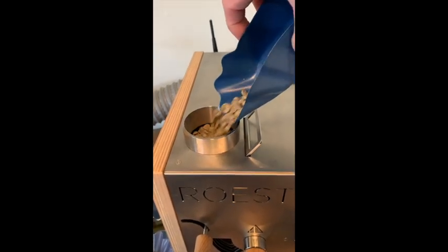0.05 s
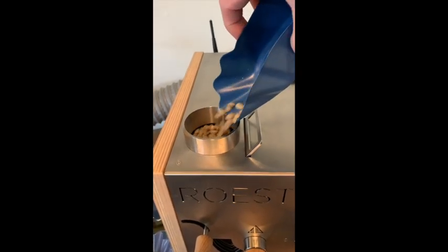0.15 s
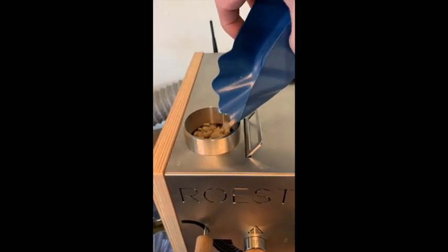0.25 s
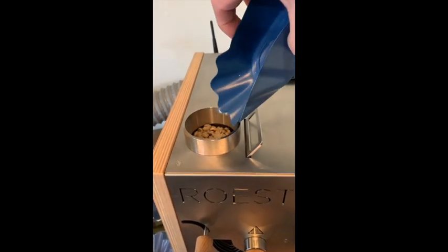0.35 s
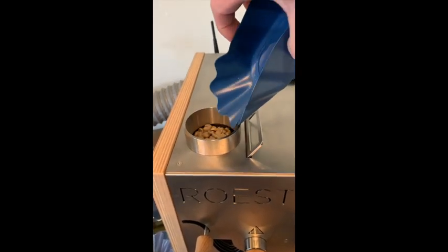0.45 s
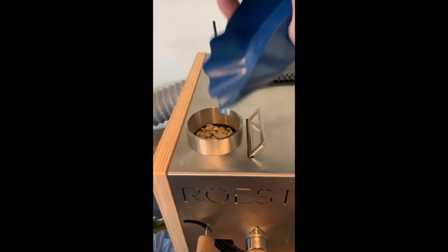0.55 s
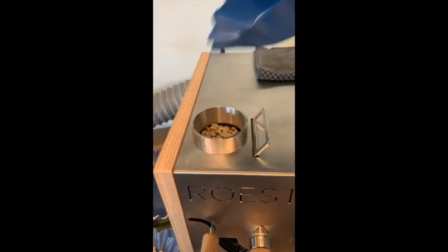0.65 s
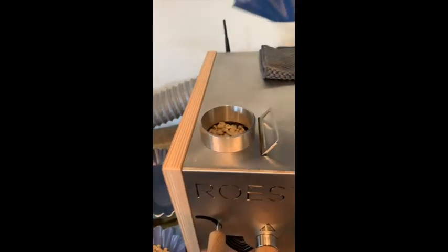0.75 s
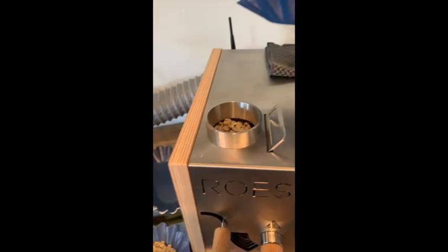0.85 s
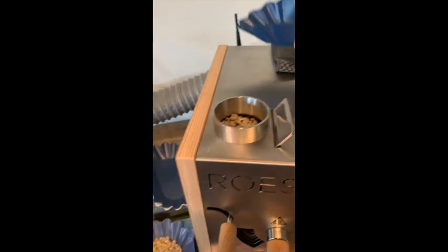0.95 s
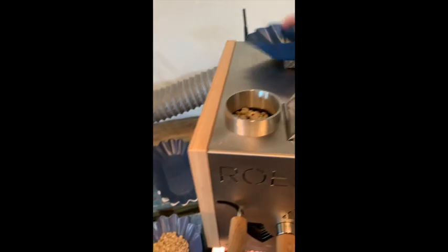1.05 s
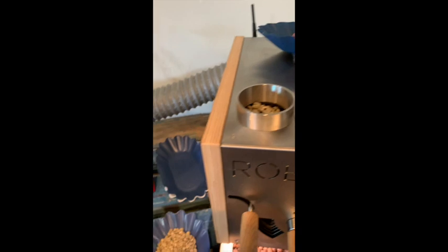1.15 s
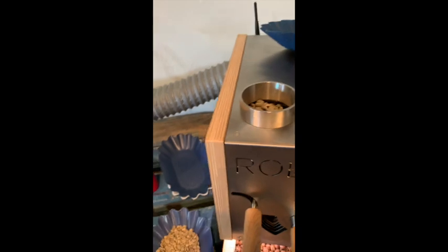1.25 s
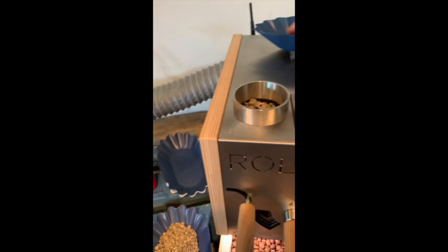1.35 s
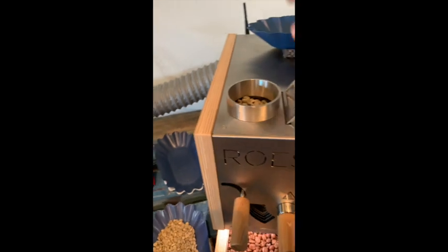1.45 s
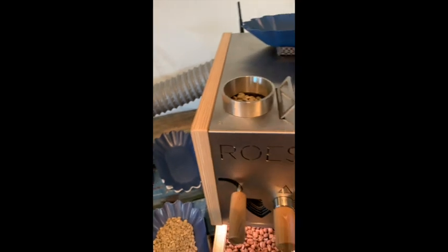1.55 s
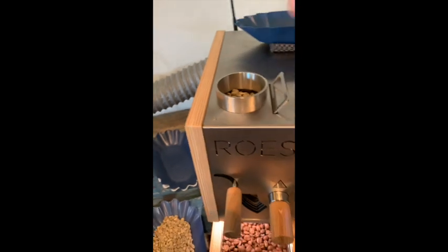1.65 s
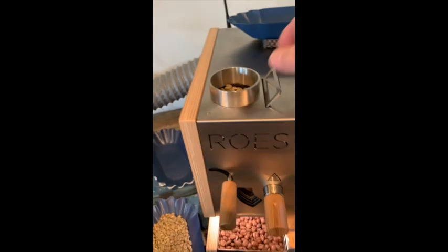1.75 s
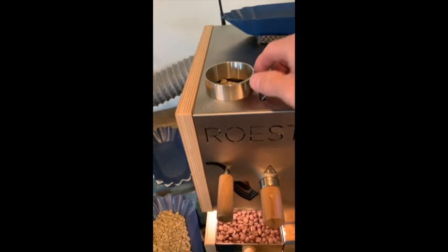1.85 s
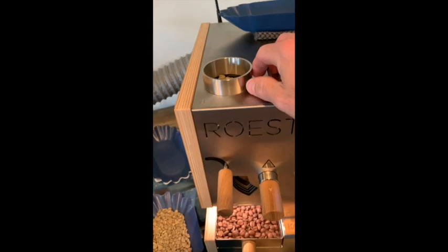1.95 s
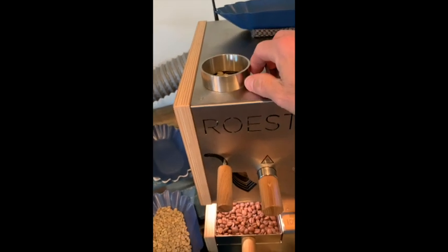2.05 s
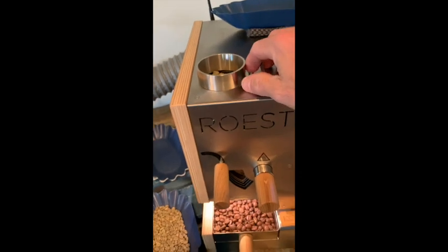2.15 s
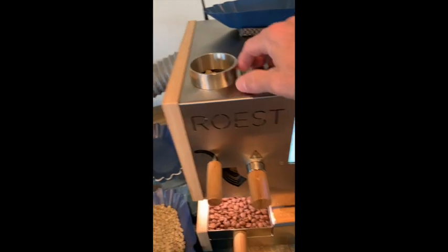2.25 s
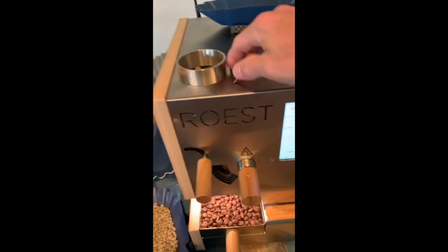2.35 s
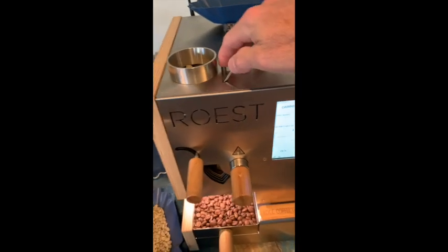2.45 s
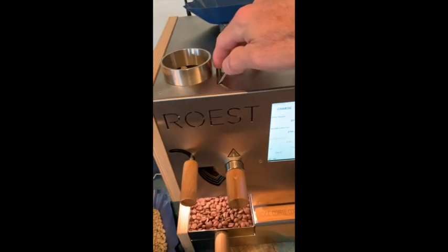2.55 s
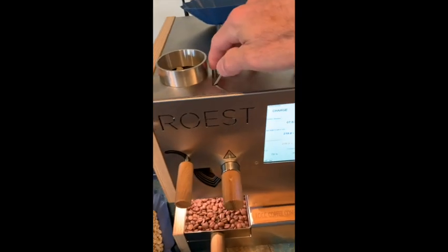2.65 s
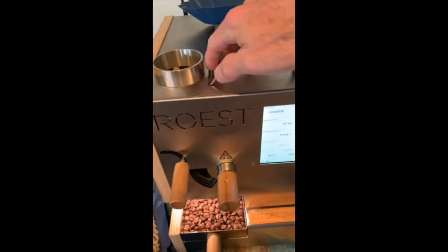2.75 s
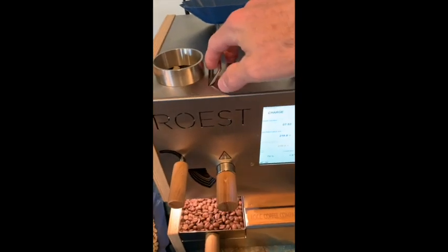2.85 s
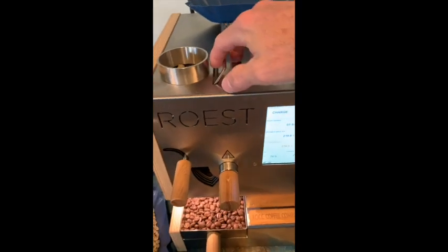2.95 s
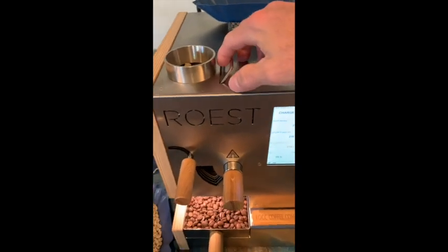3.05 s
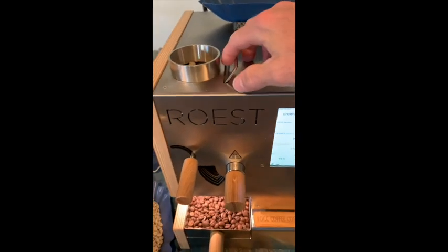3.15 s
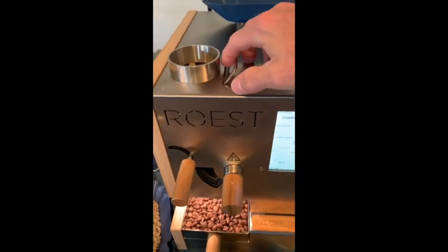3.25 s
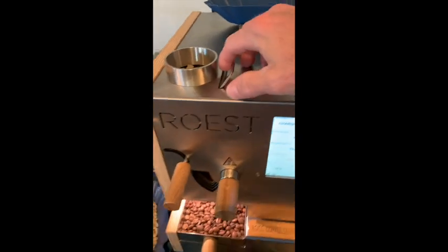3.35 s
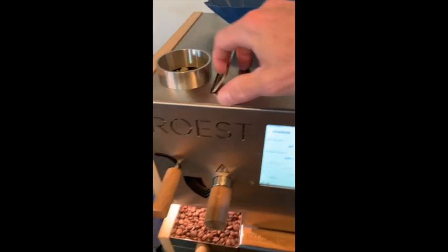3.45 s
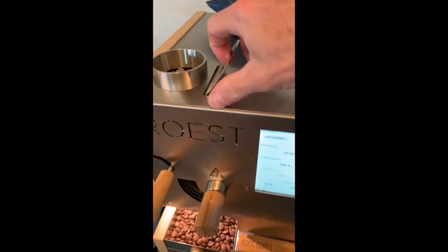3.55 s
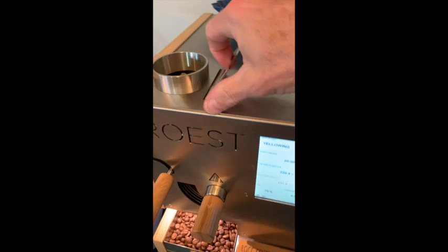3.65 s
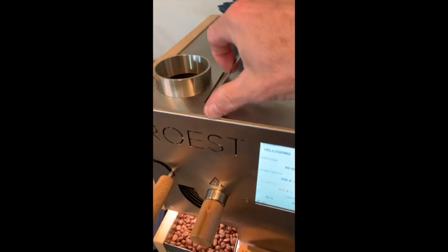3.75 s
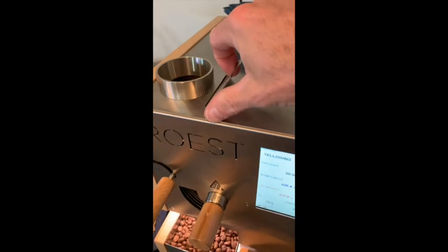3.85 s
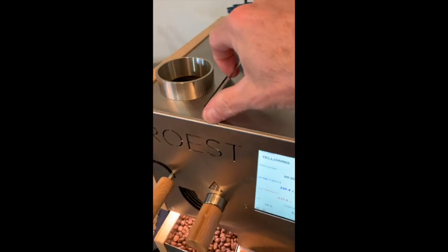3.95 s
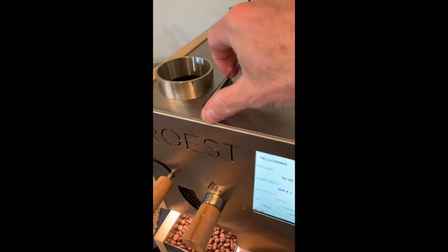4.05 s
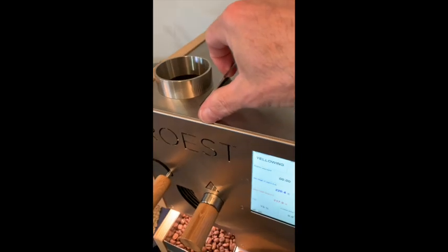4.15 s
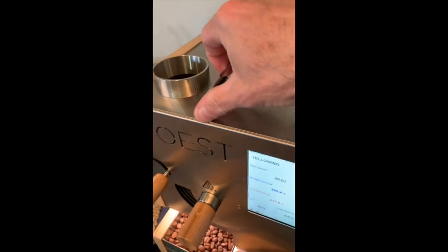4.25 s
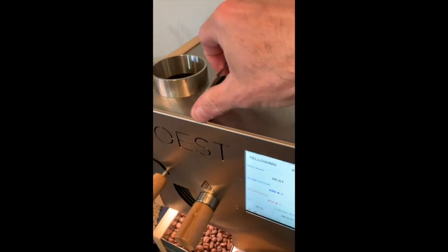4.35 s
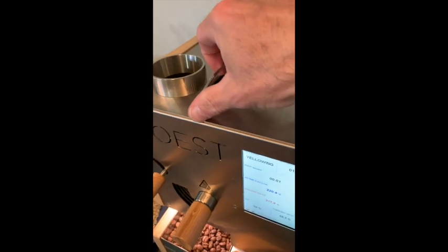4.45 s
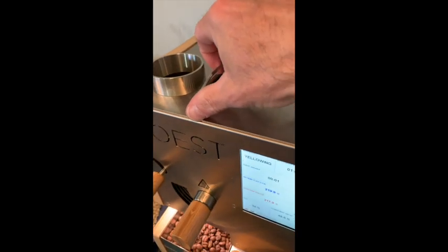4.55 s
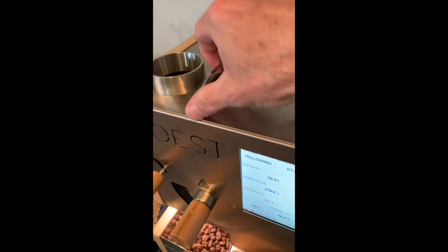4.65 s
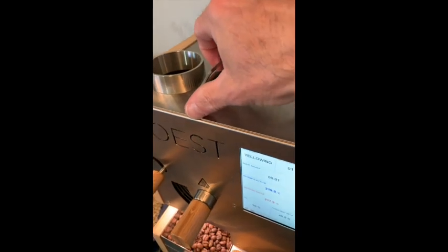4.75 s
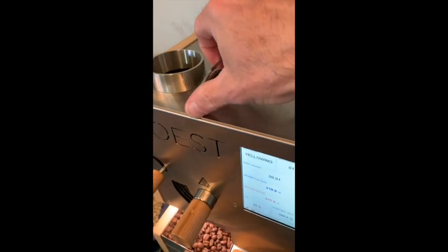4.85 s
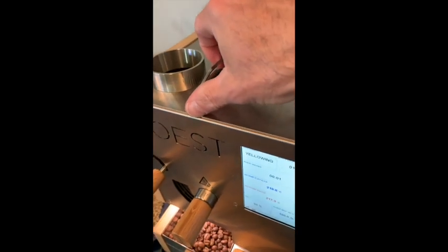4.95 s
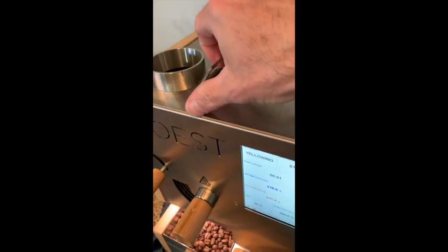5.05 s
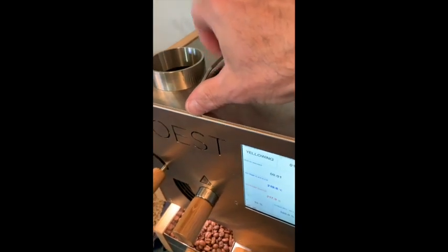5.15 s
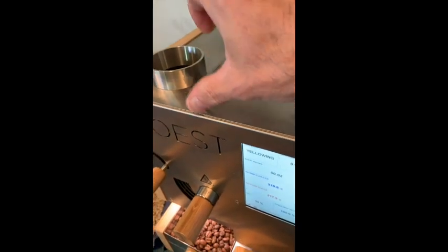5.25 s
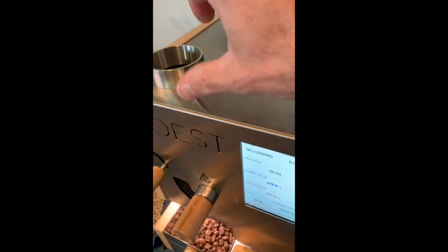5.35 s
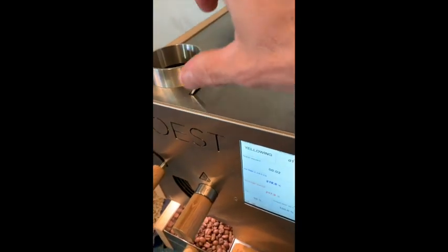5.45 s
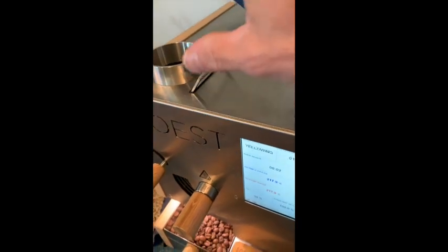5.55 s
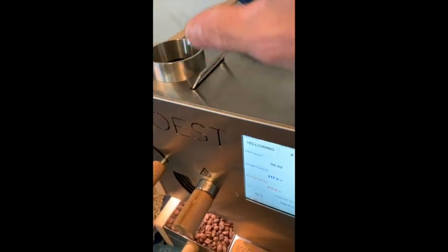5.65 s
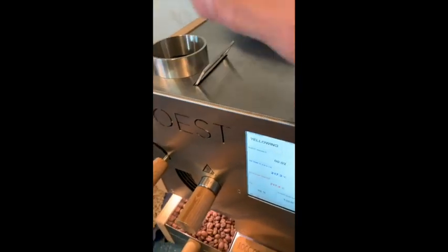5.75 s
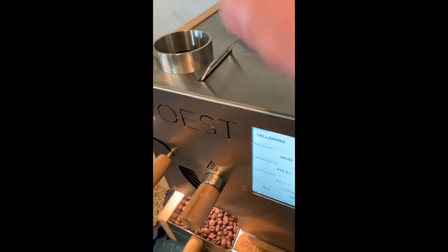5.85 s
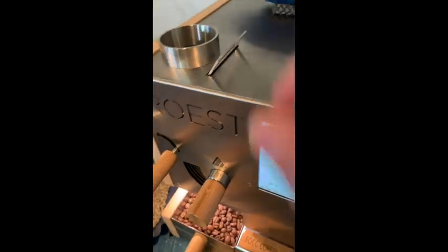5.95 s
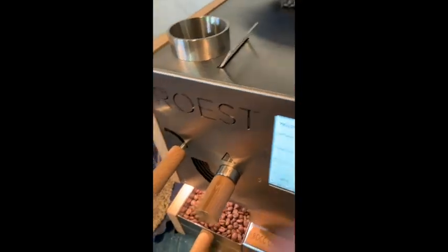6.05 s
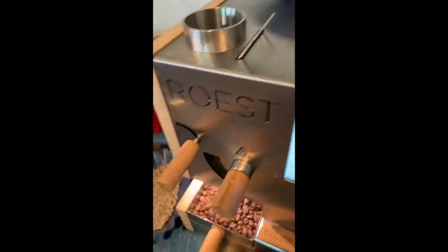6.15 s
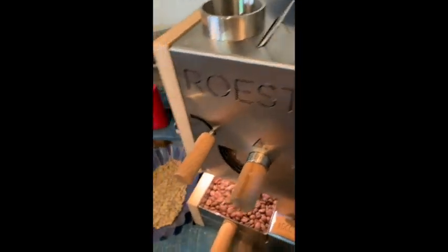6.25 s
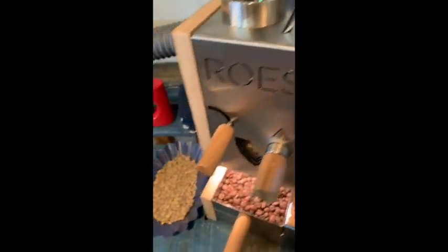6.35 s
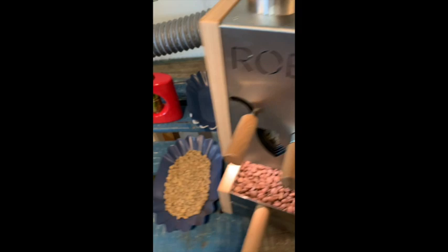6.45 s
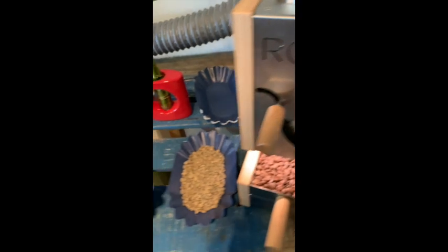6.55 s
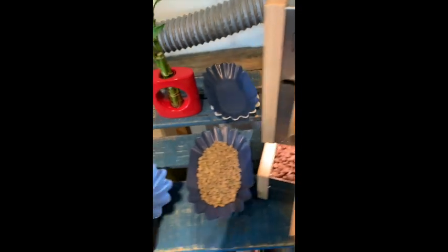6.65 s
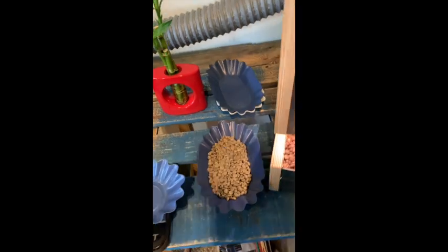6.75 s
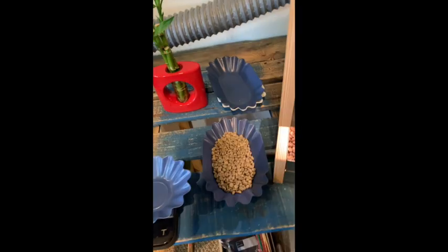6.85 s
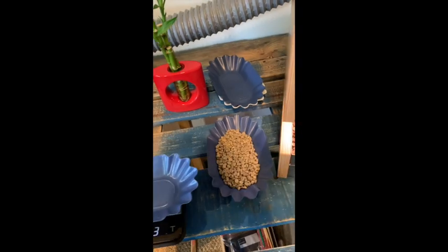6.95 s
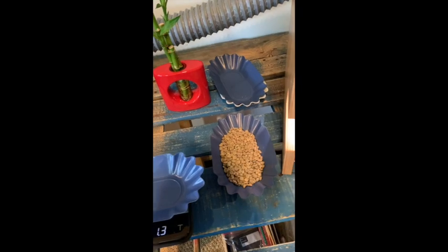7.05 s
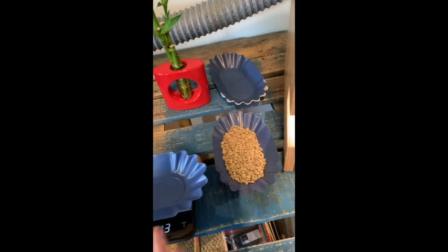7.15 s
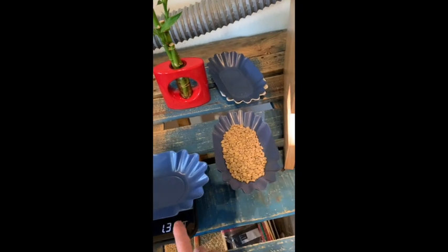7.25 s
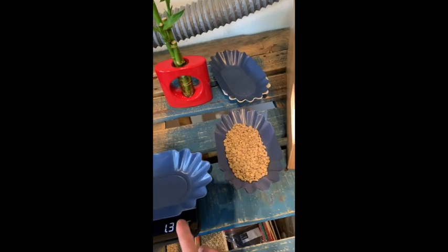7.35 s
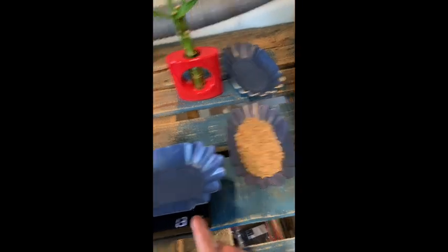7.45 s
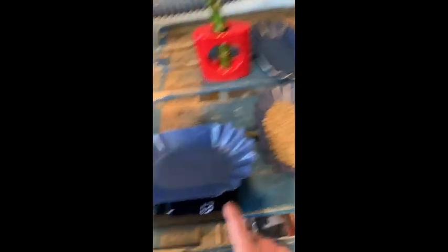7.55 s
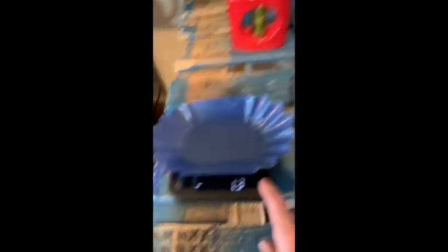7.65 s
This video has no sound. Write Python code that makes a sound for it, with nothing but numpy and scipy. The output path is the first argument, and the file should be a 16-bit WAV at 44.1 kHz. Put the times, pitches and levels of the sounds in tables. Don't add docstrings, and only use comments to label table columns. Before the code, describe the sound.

Over a low machine hum, beans rattle into a metal cup, then a sharp lever clack releases them into a drum; a second clack follows.

```python
import sys
import numpy as np
from scipy import signal
from scipy.fft import rfft, irfft, next_fast_len
from scipy.io import wavfile
from scipy.ndimage import uniform_filter1d, map_coordinates

SR = 44100
rng = np.random.default_rng(int(sys.argv[2]) if len(sys.argv) > 2 else 0)


def output_pcm(signal):
    pcm = np.clip(np.atleast_2d(signal).T, -1, 1) * 32767
    wavfile.write(sys.argv[1], SR, np.round(pcm).astype(np.int16))


def magnitude_from_level(level_db):
    exponent = np.asarray(level_db, float) / 20
    return 10 ** exponent


N = 340447
LANDED_S = 4.5

# t/s, peak level/dB, brightness/dB
OPEN = [
    (3.5185, -12.5, 12),
    (3.5215, -10.5, -11),
    (3.5245, -6, -11),
    (3.530, -15.5, 3),
    (3.536, -22.5, 5),
    (3.547, -31, 8),
    (3.571, -28, -6),
]
# t/s, peak level/dB, brightness/dB
SHUT = [
    (5.2212, -23, 12),
    (5.2288, -12, 10.5),
    (5.2331, -7, 6),
    (5.243, -17.5, 10.5),
]
# t/s, level/dB
NEAR = [(0, 0), (1.9, -1), (2.6, -0.5), (4.2, -1.5), (4.7, -3.5), (6.4, -4.5), (6.9, -6), (7.72, -8.5)]


def unit(x):
    return x / np.sqrt(np.mean(x ** 2) + 1e-20)


def along(points, hz):
    f, v = np.transpose(points)
    return np.interp(np.log(hz + 1), np.log(f + 1), v)


def curve(points, **ends):
    s, v = np.transpose(points)
    return np.interp(np.arange(N) / SR, s, v, **ends)


def ramp(start_s, rise_s):
    return np.clip((np.arange(N) / SR - start_s) / rise_s, 0, 1)


def wobble(rate):
    knots = rng.standard_normal(int(N * rate / SR) + 4)
    return map_coordinates(knots, [np.arange(N) * rate / SR])


def noise():
    return rng.standard_normal(N)


def filtered(x, response):
    m = next_fast_len(N + SR // 2)
    return irfft(rfft(x, m) * response(np.fft.rfftfreq(m, 1 / SR)), m)[..., :N]


def coloured(x, spectrum):
    closed = [(spectrum[0][0] / 2, -120), *spectrum, (spectrum[-1][0] * 1.03, -120)]
    return unit(filtered(x, lambda hz: magnitude_from_level(along(closed, hz))))


def overlaid(when, rings):
    start = (when * N).astype(int)
    length = rings.shape[1]
    places = start[:, None] + np.arange(length)
    return np.bincount(places.ravel(), rings.ravel(), N + length)[:N]


def strikes(lo_hz, hi_hz, t60, scatter_db, tick_db, count):
    when, pitch, size = rng.random((count, 3)).T
    size = magnitude_from_level(-scatter_db * np.log(1 - size))
    t = np.arange(160) / SR
    fade = magnitude_from_level(-60 * t / t60) * np.hanning(2 * len(t))[len(t):]
    hz = lo_hz + pitch * (hi_hz - lo_hz)
    rings = size[:, None] * fade * np.sin(2 * np.pi * hz[:, None] * t)
    clicks = np.bincount((when * N).astype(int), size * np.sign(pitch - .5), N)
    return unit(overlaid(when, rings)) + magnitude_from_level(tick_db) * unit(clicks)


def steel(modes, later_modes, t60, spread, count):
    when, which, size, off = rng.random((count, 4)).T
    pick = lambda table: np.array(table)[(which * len(table)).astype(int)].T
    hz, db = np.where(when * N < LANDED_S * SR, pick(modes), pick(later_modes))
    hz = hz * (1 + spread * (off - .5))
    t = np.arange(1700) / SR
    fade = magnitude_from_level(-60 * t / t60) * np.hanning(2 * len(t))[len(t):] * np.minimum(t / 0.00044, 1)
    strength = magnitude_from_level(db - 2.7 * np.log(1 - size))
    return unit(overlaid(when, strength[:, None] * fade * np.sin(2 * np.pi * hz[:, None] * t)))


def patchy(x, depth_db):
    z = signal.stft(x, nperseg=512)[2]
    field = uniform_filter1d(rng.standard_normal(z.shape), size=2, axis=0)
    field = uniform_filter1d(field, size=14, axis=1)
    return signal.istft(z * magnitude_from_level(depth_db * unit(field)), nperseg=512)[1][:N]


def stream(power, bright, walls, later_walls, modes, later_modes, clump_db, ring_db):
    patter_db, wall_db = 10 * np.log10(power)
    clumps = .6 * clump_db * wobble(45) + 1.5 * clump_db * wobble(200)
    blur = lambda near, db: patchy(near + magnitude_from_level(db) * noise(), depth_db=1.5)
    patter = strikes(3120, 16000, t60=0.076, scatter_db=1.5, tick_db=10.5, count=20000)
    patter = magnitude_from_level(patter_db + 6.0 + clumps) * coloured(blur(patter, db=6.5), bright)
    rattle = strikes(690, 4930, t60=0.042, scatter_db=-0.2, tick_db=0.5, count=7000)
    rattle = blur(rattle, db=2)
    landed = np.arange(N) >= LANDED_S * SR
    rattle = np.where(landed, coloured(rattle, later_walls), coloured(rattle, walls))
    ring = steel(modes, later_modes, t60=0.4, spread=0.027, count=2600)
    ring = magnitude_from_level((patter_db + wall_db) / 2 + ring_db) * ring
    return patter + magnitude_from_level(wall_db - 1.0 + clumps) * rattle + ring


def swells(rows, start_db, sag_db_s, fall_db_s):
    t, patter, wall = np.arange(N) / SR, 1e-12, 1e-12
    for s, rise, length, db, wall_db in rows:
        climb_db = start_db * (1 - ramp(s, rise))
        sag_db = sag_db_s * np.maximum(t - s - rise, 0)
        fall_db = fall_db_s * np.maximum(t - s - length, 0)
        power = magnitude_from_level(2 * (db + climb_db - sag_db - fall_db)) * ramp(s, 0.0034)
        patter = patter + power
        wall = wall + power * magnitude_from_level(2 * wall_db)
    return np.array([patter, wall])


def ticks(events, low_hz, t60, level_db):
    out, t = np.zeros(N + SR), np.arange(SR // 100) / SR
    for s, db in events:
        click = magnitude_from_level(db + level_db - 60 * t / t60) * rng.standard_normal(len(t))
        out[round(s * SR):][:len(t)] += click
    return filtered(out[:N], lambda hz: (1j * hz / (low_hz + 1j * hz)) ** 3)


def drum_beans():
    # t/s, level/dB
    rush = [
        (3.636, -47),
        (3.655, -31),
        (3.74, -34.5),
        (3.82, -29),
        (3.9, -32.5),
        (4.2, -32),
        (4.26, -34.5),
        (4.33, -32.5),
        (4.41, -41.5),
    ]
    # start t/s, rise/s, length/s, patter level/dB, wall over patter/dB
    paddles = [
        (4.56, 0.24, 0.364, -46.5, -1),
        (4.95, 0.25, 0.34, -39.5, 0.5),
        (5.33, 0.12, 0.17, -51.5, 2),
        (5.52, 0.099, 0.4, -40.5, -3),
        (5.99, .11, 0.37, -40.5, 0.5),
        (6.465, 0.13, 0.446, -44, 2),
        (6.93, 0.15, 0.46, -45.5, 1.5),
        (7.51, 0.058, .4, -46, 6),
    ]
    # start t/s, rise/s, length/s, patter level/dB, wall over patter/dB
    spits = [(3.44, 0.068, 0.051, -56, 20), (3.59, 0.043, .05, -43.5, 4), (4.39, .01, 0.14, -46.5, -2),
             (4.417, .003, 0.0087, -39.5, -6), (4.438, 0.0027, .01, -42.5, -3),
             (4.468, 0.0047, 0.023, -37.5, -5), (4.497, .004, 0.0085, -49, -4),
             (5.49, 0.0055, 0.0088, -47, 1), (6.29, .01, 0.012, -59, -6), (6.33, .02, 0.079, -55, 9),
             (6.464, .003, 0.034, -50, -8), (6.5, 0.018, 0.03, -45, -1), (6.59, 0.0092, .03, -45, -6),
             (7.485, 0.003, 0.0053, -60, 1), (7.53, 0.023, 0.16, -53.5, 10)]
    # start t/s, rise/s, length/s, patter level/dB, wall over patter/dB
    bed = [
        (4.42, .1, 4, -63, 11),
    ]
    # t/s, peak level/dB
    pelts = [(4.4184, -26), (4.4393, -30), (4.4752, -26), (4.9531, -32), (4.9681, -27), (4.9945, -41),
             (5.03, -21), (5.0554, -34), (5.108, -37), (5.1337, -30), (5.4959, -26), (5.5298, -31),
             (5.667, -31), (5.9973, -36), (6.153, -30), (6.2971, -44), (6.367, -38), (6.6, -31),
             (7.01, -35), (7.39, -34), (7.4849, -26), (7.5418, -37)]
    # f/Hz, density/dB
    patter_colour = [(2500, -30), (4000, -3), (4600, -4), (5500, 0), (6400, 0), (7400, -1.5), (7950, 4),
                     (8650, 4), (9250, 0), (11000, 0), (12500, -3), (14000, -4), (15100, -4.5), (15700, -3)]
    # f/Hz, density/dB
    chute_rattle = [(600, -42), (1100, -15.5), (1800, -14), (2250, -10), (2490, -8), (2750, -10),
                    (3550, -8.5), (4200, -9.5), (5000, -49)]
    # f/Hz, density/dB
    drum_rattle = [(600, -26), (1150, -4), (1900, -9.5), (2500, -4.5), (3000, -5.5), (3600, -6),
                   (4200, 0.5), (5000, -8)]
    # f/Hz, level/dB
    chute_modes = [(1510, -8), (1790, -3), (2450, 4), (2520, 5), (3210, -4), (3420, -6), (5570, 0),
                   (6370, 4), (6680, 2), (7830, 4), (8030, 5), (8500, 4), (10600, 0), (11100, 0)]
    # f/Hz, level/dB
    drum_modes = [(1950, -4), (2470, -3), (3300, -2), (3560, 2), (3700, 2), (3820, 0), (5530, -2),
                  (6000, -1), (6370, -3), (6900, -3), (7600, -1), (10200, 0), (10600, 2), (11800, 0)]
    flow = magnitude_from_level(2 * curve(rush, left=-120, right=-120)) * magnitude_from_level([[0], [-1]])
    flow = flow + swells(paddles, start_db=-8, sag_db_s=23.0, fall_db_s=344)
    flow = flow + swells(spits, start_db=-20, sag_db_s=18, fall_db_s=400)
    flow = flow + swells(bed, start_db=-10, sag_db_s=-2.0, fall_db_s=0)
    falling = stream(flow, patter_colour, chute_rattle, drum_rattle, chute_modes, drum_modes,
                     clump_db=0.66, ring_db=0)
    return falling + ticks(pelts, 2000, t60=0.0055, level_db=2)


def hopper_beans():
    # start t/s, rise/s, length/s, patter level/dB, hollow over patter/dB
    pour = [
        (-.1, 0.077, 0.27, -43.5, 6),
        (.17, .01, 0.057, -51.5, 6),
        (.5, 0.099, 0.19, -62.5, 8.5),
        (.89, 0.012, 0.063, -58, 9),
        (1.0, 0.042, 0.048, -62, 19),
        (1.09, .02, 0.14, -64, 13),
    ]
    # t/s, peak level/dB
    strays = [(.0135, -30), (.0265, -35), (.0415, -37), (0.0665, -55), (.098, -37), (.1425, -40),
              (.1535, -39), (0.1794, -41), (.193, -37), (.1985, -38), (0.2094, -38), (0.2329, -43),
              (.2365, -28), (0.2464, -35), (0.2524, -29), (0.2584, -45), (0.2674, -43), (0.2773, -31),
              (0.2814, -42), (0.2997, -41), (0.3254, -44)]
    # f/Hz, density/dB
    spill = [(2300, -30), (3300, 1.5), (4500, -1.5), (6300, 0), (7400, -5), (8600, -2), (11000, -4),
             (13000, -5), (15750, -5)]
    # f/Hz, density/dB
    hollow = [(600, -11.5), (1200, -12.5), (1550, -4.5), (1900, -5.5), (2200, -11), (2600, -17.5),
              (3600, -13)]
    # f/Hz, level/dB
    hopper_modes = [(1560, -4), (1800, -1), (1880, 0), (1960, -1), (2100, -4), (2290, -7), (3000, -9),
                    (3710, -10), (4180, -11), (6100, -11), (6500, -11), (7000, -14)]
    flow = swells(pour, start_db=-15, sag_db_s=0, fall_db_s=166)
    sliding = stream(flow, spill, hollow, hollow, hopper_modes, hopper_modes, clump_db=.9, ring_db=3.5)
    return sliding + ticks(strays, 7700, t60=0.0072, level_db=10)


def knocks(events, modes, crack_t60, crack_db, box_t60, box_db):
    # f/Hz, density/dB
    crack_colour = [(60, -44), (150, -9), (400, -10.5), (1500, -1.5), (3000, -4), (6000, -4),
                    (11000, -10.5), (16000, -9)]
    # f/Hz, density/dB
    box_colour = [(150, -1), (300, -7), (800, 0.5), (1800, -7.5), (3000, -10), (4500, -6), (7000, -40)]
    rings, cracks, wash = np.zeros((3, N + SR))
    t = np.arange(SR // 2) / SR
    rise, slow_rise = 1 - np.exp(-t / 0.0003), 1 - np.exp(-t / 0.0039)
    for s, db, bright_db in events:
        span = slice(round(s * SR), round(s * SR) + len(t))
        for hz, level, t60 in modes:
            mode_db = db - 12.0 + level + 1.8 * rng.standard_normal()
            tone = np.sin(2 * np.pi * hz * t + rng.uniform(0, 9.7))
            rings[span] += magnitude_from_level(mode_db - 60 * t / t60) * rise * tone
        crack = magnitude_from_level(db + crack_db + bright_db - 60 * t / crack_t60) * rise
        cracks[span] += crack * rng.standard_normal(len(t))
        box = magnitude_from_level(db + box_db - 60 * t / box_t60) * slow_rise
        wash[span] += box * rng.standard_normal(len(t))
    cracks = filtered(cracks[:N], lambda hz: magnitude_from_level(along(crack_colour, hz)))
    wash = filtered(wash[:N], lambda hz: magnitude_from_level(along(box_colour, hz)))
    return rings[:N] + cracks + wash


def lever():
    # t/s, peak level/dB, brightness/dB
    rebound = [
        (5.2695, -33, 12),
        (5.2778, -17.5, 11),
        (5.2815, -17, 1),
        (5.288, -22, 5),
        (5.294, -24, 7),
        (5.299, -21, -15),
    ]
    # f/Hz, level/dB, t60/s
    case_open = [(207, -3, 0.05), (284, -2, 0.1), (376, -3, 0.1), (500, -9, 0.1), (716, -2, 0.11),
                 (940, -7, .09), (1190, -8, 0.11), (1550, 7, 0.04), (1640, -5, .08), (2008, -7, 0.1),
                 (2740, -2, 0.03), (2966, -12, .06), (6140, -20, 0.05), (11300, -14, 0.034)]
    # f/Hz, level/dB, t60/s
    case_shut = [(220, -6, .06), (340, -3, .07), (480, -7, .06), (711, -9, .07), (930, -9, .05),
                 (1380, -5, .04), (1669, -2, .085), (2150, -1, .045), (2500, -5, .035), (3381, -11, .04),
                 (5800, -8, .05), (6298, -12, .06), (10300, -11, .025), (10900, -12, .025)]
    # f/Hz, level/dB, t60/s
    case_rebound = [(500, -8, .07), (711, -3, .14), (1000, -8, .07), (1287, -6, .09), (1674, -3, .09),
                    (1997, -7, .07), (2347, -6, .07), (2902, -9, .05), (6358, -9, .05), (6665, -9, .05),
                    (7197, -10, .04)]
    opening = knocks(OPEN, case_open, crack_t60=0.037, crack_db=2.0, box_t60=0.2, box_db=-2.5)
    shutting = knocks(SHUT, case_shut, crack_t60=0.04, crack_db=-0.5, box_t60=.08, box_db=-7)
    swing = knocks(rebound, case_rebound, crack_t60=0.032, crack_db=-0.5, box_t60=0.12, box_db=-5)
    return opening + shutting + swing


def latch_spring():
    t = np.maximum(np.arange(N) / SR - 5.271, 0)
    return magnitude_from_level(-31 - 60 * t / .55) * np.sin(2 * np.pi * 5545 * t)


def tray():
    # t/s, peak level/dB, brightness/dB
    taps = [
        (1.047, -16, 0),
        (1.0505, -6.5, -8.5),
        (1.0593, -17, -2),
        (1.0714, -13.5, -10),
        (1.0844, -35, -2),
    ]
    # f/Hz, level/dB, t60/s
    plastic = [(382, -6, .06), (1050, -10, .05), (1420, 0, .045), (1640, -1.5, .045), (2200, -8, .04),
               (3210, -8, .05), (3730, -9, .05), (4500, -12, .04), (5600, -16, .04)]
    # t/s, peak level/dB, brightness/dB
    nudge = [
        (.951, -33, -14),
        (.9595, -27, -18),
        (1.1244, -34, -20),
        (1.14, -36, -20),
        (1.1648, -33, -14),
    ]
    # f/Hz, level/dB, t60/s
    rim = [(1366, 10.5, 0.044), (1540, 2, 0.054)]
    # t/s, peak level/dB, brightness/dB
    lip = [
        (.214, -35, -20),
        (.234, -25, -20),
    ]
    # f/Hz, level/dB, t60/s
    lip_modes = [(6970, -2, 0.063), (6600, -11, .05)]
    put_down = knocks(taps, plastic, crack_t60=0.068, crack_db=-3.0, box_t60=0.13, box_db=-10)
    touches = knocks(nudge, rim, crack_t60=.03, crack_db=8, box_t60=.05, box_db=-30)
    clips = knocks(lip, lip_modes, crack_t60=.01, crack_db=0, box_t60=.02, box_db=-40)
    return put_down + touches + clips


def motor():
    # t/s, turns/Hz
    shaft = [(0, 6.33), (.4, 6.3), (.9, 5.47), (1.6, 5.47), (2.3, 5.85), (2.75, 5.43), (3.2, 5.4),
             (4.3, 5.44), (5.5, 5.24), (7.72, 5.18)]
    multiples = [8, 11, 12, 13, 16, 19, 20, 21, 22]
    order_levels = [-46.5, -46, -51, -47, -50.5, -52.5, -54, -50.5, -66]
    # f/Hz, width/Hz, level/dB
    booms = [(50.2, 0.94, 12.5), (82.7, 3.7, -5.5), (99.8, 1, 6.5), (135, 5.7, -7)]
    # f/Hz, density/dB
    rumble = [(30, -26), (45, -9), (65, -20), (85, -4.5), (100, -10), (114, -1.5), (126, -11), (140, -18),
              (170, -34)]
    turns_hz = curve(shaft)
    angle = 2 * np.pi * np.cumsum(turns_hz) / SR
    hum = magnitude_from_level(-53.5) * coloured(noise(), rumble)
    for k, db in zip(multiples, order_levels):
        boom_db = sum(lift / (1 + ((k * turns_hz - hz) / width) ** 2) for hz, width, lift in booms)
        phase = k * angle + 0.1 * wobble(6.7) + 6 * rng.random()
        hum = hum + magnitude_from_level(db + 5.5 + boom_db + 1.5 * wobble(3)) * np.sin(phase)
    return magnitude_from_level(curve(NEAR)) * hum


def steady_tone(hz, db, sway_db):
    angle = 2 * np.pi * np.cumsum(hz + 0.28 * wobble(5)) / SR
    return magnitude_from_level(db - 2 + sway_db * wobble(7)) * np.sin(angle)


def breathy_tone(hz, width_hz):
    return unit(filtered(noise(), lambda f: 1 / (1 + ((f - hz) / width_hz) ** 2)))


def fan():
    # f/Hz, density/dB
    fan_colour = [(71, -50), (120, -5), (131, -10), (145, -14), (210, -5), (247, -5.5), (291, -2.5),
                  (337, -6), (405, -3), (440, -10), (495, -6.5), (608, -14.5), (700, -18), (910, -81),
                  (1540, -120)]
    near_db = curve(NEAR)
    chute_open = ramp(OPEN[0][0], 0.25) - ramp(SHUT[1][0], 0.15)
    level_db = -40 + 0.12 * near_db + chute_open + .6 * wobble(3.1) + 0.88 * wobble(8)
    blades = steady_tone(408, -42.5 + 0.13 * near_db, sway_db=1.5)
    return magnitude_from_level(level_db) * coloured(noise(), fan_colour) + blades


def air():
    # f/Hz, density/dB
    hiss_colour = [(450, -28), (600, -5), (850, 0), (1140, 1.5), (1400, -3.5), (2000, -5.5), (2600, -13),
                   (4000, -13), (6000, -21.5), (7300, -34), (8700, -39), (10000, -39), (15700, -38.5)]
    # f/Hz, width/Hz, level/dB
    duct = [(1123.5, 13, -54.5), (1946, 8.7, -62)]
    opens, shuts = OPEN[0][0], SHUT[1][0]
    air_db = -46 + 0.41 * curve(NEAR) + 3 * ramp(opens, 0.14)
    out = magnitude_from_level(air_db + 1.5 + 0.25 * wobble(3.9)) * coloured(noise(), hiss_colour)
    turn_db = 12 * (ramp(1.6, 0.72) - ramp(6.4, 0.81))
    for hz, width_hz, db in duct:
        out = out + magnitude_from_level(db + air_db + 35.5 + turn_db) * breathy_tone(hz, width_hz)
    draught_db = 13 * (ramp(opens, 0.53) - ramp(shuts, .05))
    gulp_db = 16 * (ramp(opens, 0.026) - ramp(opens + 0.24, 0.27))
    low_pipe = magnitude_from_level(-55 + draught_db + 1.5 * wobble(5)) * breathy_tone(285, 15)
    high_pipe = magnitude_from_level(-54.5 + gulp_db + 4.8 * wobble(4.22)) * breathy_tone(495.0, 22.0)
    return out + low_pipe + high_pipe


def whine():
    # t/s, level/dB
    beam = [(0, -51.5), (1.2, -52), (1.75, -42), (2.6, -41), (3.3, -51), (3.95, -48), (4.5, -49),
            (5.5, -45.5), (6.4, -48.5), (6.75, -53.5), (7.72, -51.5)]
    return steady_tone(904.6, curve(beam), sway_db=.6) * magnitude_from_level([[-3], [3.5]])


def shell(x, t60, level_db):
    t = np.arange(SR // 4) / SR
    tail = rng.standard_normal(len(t)) * magnitude_from_level(-60 * t / t60)
    return x + magnitude_from_level(level_db) * signal.fftconvolve(x, tail / np.linalg.norm(tail))[:N]


def gain_control():
    # t/s, depth/dB
    ducks = [
        (3.53, -0.5),
        (5.24, 4),
    ]
    in_s, hold_s, out_s = 0.059, 0.075, 0.1
    dip_db = sum(db * (ramp(s, in_s) - ramp(s + in_s + hold_s, out_s)) for s, db in ducks)
    return magnitude_from_level(-dip_db)


def ports(x):
    # f/Hz, correlation
    alike = [(60, 0.999), (150, .995), (300, 0.97), (700, 0.6), (1000, 0.12), (1400, 0.73), (2200, 0.76),
             (2900, 0.79), (3600, 0.8), (4400, 0.93), (5200, .93), (6500, .85), (12000, .85)]
    z = signal.stft(x, nperseg=512)[2]
    drift = uniform_filter1d(rng.standard_normal(z.shape), size=3, axis=0)
    drift = uniform_filter1d(drift, size=9, axis=1)
    other = signal.istft(z * np.exp(1j * np.pi * unit(drift)), nperseg=512)[1][:N]
    turn = lambda hz: np.arccos(np.clip(along(alike, hz), -1, 1)) / 2
    mid = filtered(x, lambda hz: np.cos(turn(hz)))
    side = filtered(other, lambda hz: np.sin(turn(hz)))
    return np.array([mid + side, mid - side])


def scene():
    beans = drum_beans() + hopper_beans()
    hits = shell(tray() + lever(), 0.23, level_db=-11.0) + latch_spring()
    gain = gain_control()
    machine = gain * (motor() + fan() + air())
    return ports(beans + hits + machine) + gain * whine()


def thrifty(x):
    # f/Hz, share
    faint = [(1200, 0.069), (1900, 0.069), (4700, 0.36), (6900, 0.3), (9000, 0.46), (11100, 0.2),
             (13200, 0.44), (15400, .3)]
    hz, _, z = signal.stft(np.array([x[0] + x[1], x[0] - x[1]]) / 2, SR, nperseg=1024)
    band = (40 * np.log1p(hz / 4000)).astype(int)
    power = (band[:, None] == band) @ uniform_filter1d(abs(z) ** 2, size=3, axis=2)
    share = np.sqrt(abs(power) / (power.sum(0) + 1e-30))
    frames = z.shape[2]
    ragged = np.repeat(1 + 0.185 * rng.standard_normal(frames), 3)[:frames]
    edge = along(faint, hz)[:, None] * ragged
    total = power.sum((0, 1))
    sudden = total > magnitude_from_level(15) * uniform_filter1d(total, size=41)
    edge = edge * np.where(sudden, .3, 1)
    z = z * np.where(share < edge, magnitude_from_level(-36), 1)
    mid, side = signal.istft(z, SR, nperseg=1024)[1][:, :N]
    return np.array([mid + side, mid - side])


def low_pass(x):
    return signal.sosfilt(signal.butter(12, 16990, fs=SR, output="sos"), x)


def record(dry):
    # f/Hz, level/dB
    lean = [(100, 0.5), (300, -0.5), (700, -3), (1200, -1), (2500, -3), (3300, 0.5)]
    # f/Hz, phase/rad
    lead = [(0, 0), (250, -.2), (500, -.6), (950, -1.3), (1150, .3), (2250, .05), (2550, 1.2), (3500, 1.7),
            (4700, 3.14), (17540, 21.99)]
    half = np.array([[.5], [-.5]])

    def phone(hz):
        band = np.interp(hz, [15680, 15900], [1, .012]) * hz ** 4 / (hz ** 4 + 33 ** 4)
        phase = np.interp(hz, *np.transpose(lead))
        return band * magnitude_from_level(half * along(lean, hz)) * np.exp(1j * half * phase)

    wide = filtered(dry, phone)
    wide = wide / (1 + abs(wide / .95) ** 6) ** (1 / 6)
    return low_pass(thrifty(wide))


dry = scene()
out = record(dry)
output_pcm(out)
```